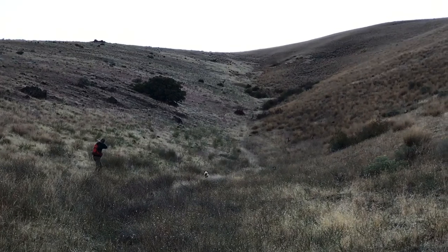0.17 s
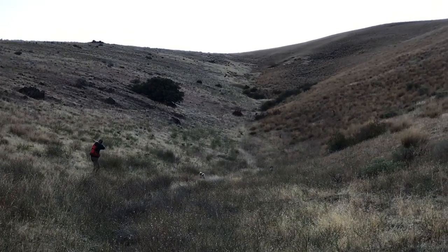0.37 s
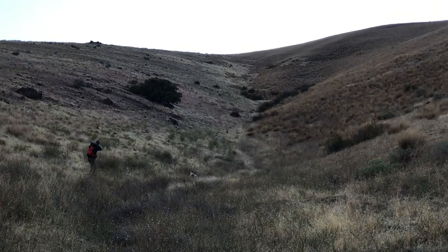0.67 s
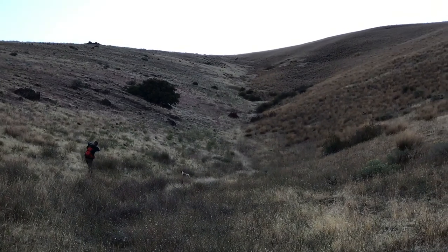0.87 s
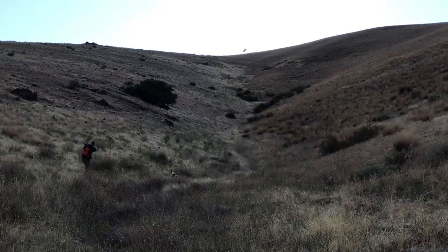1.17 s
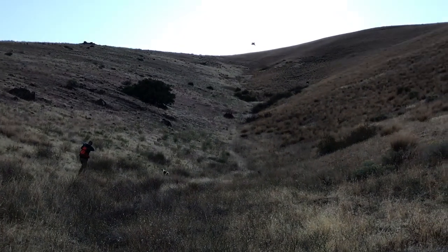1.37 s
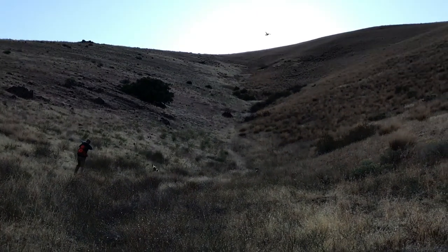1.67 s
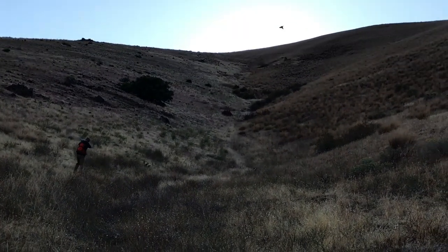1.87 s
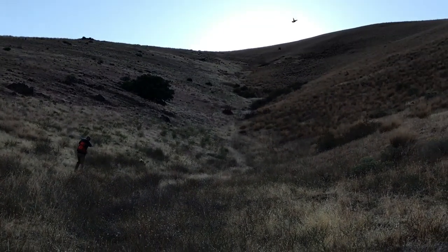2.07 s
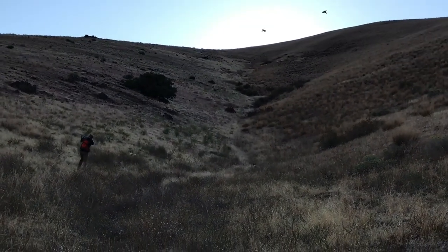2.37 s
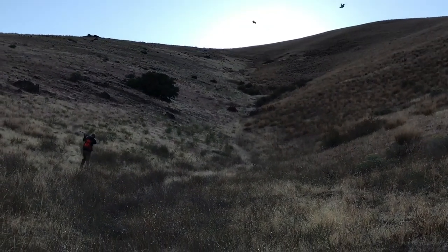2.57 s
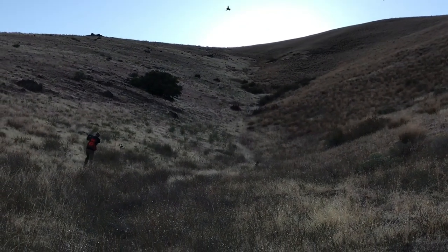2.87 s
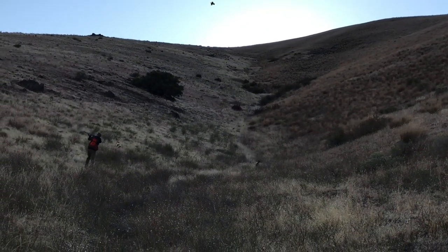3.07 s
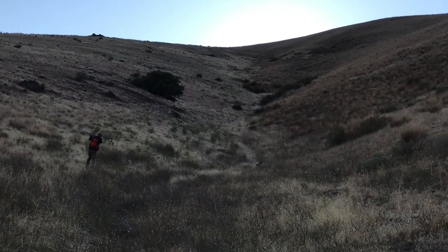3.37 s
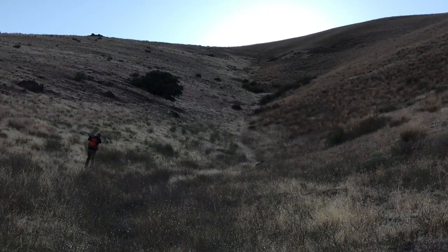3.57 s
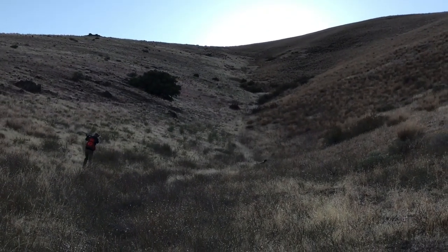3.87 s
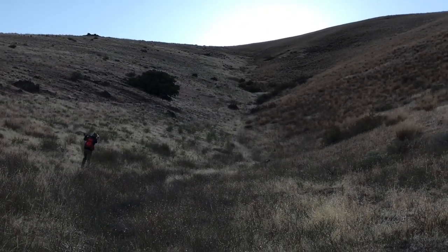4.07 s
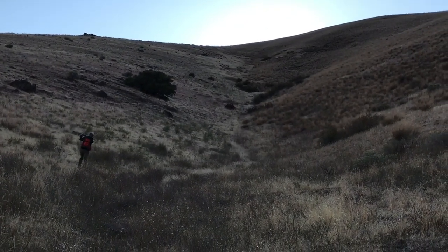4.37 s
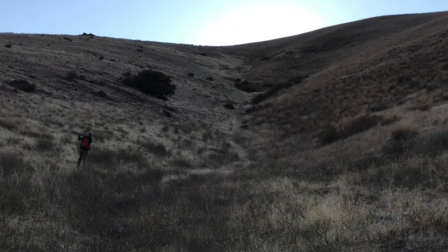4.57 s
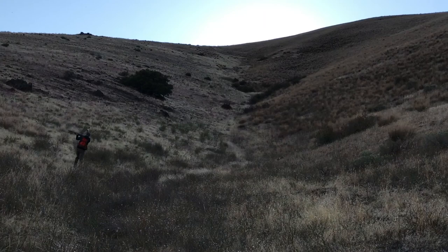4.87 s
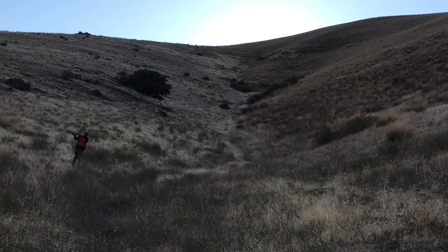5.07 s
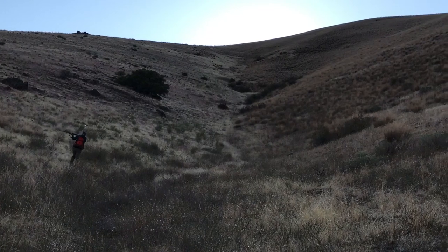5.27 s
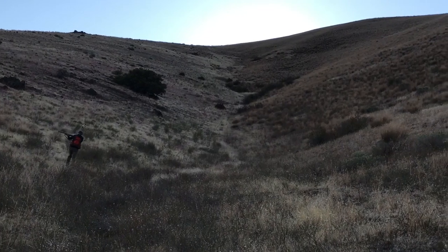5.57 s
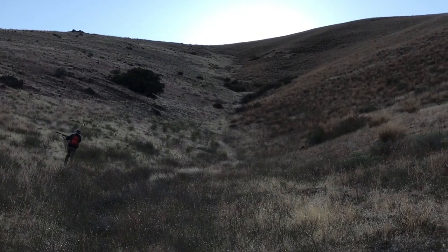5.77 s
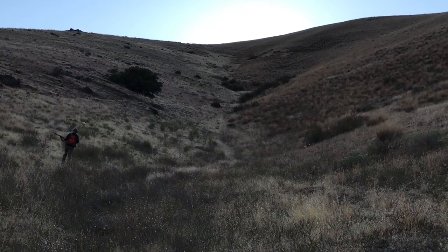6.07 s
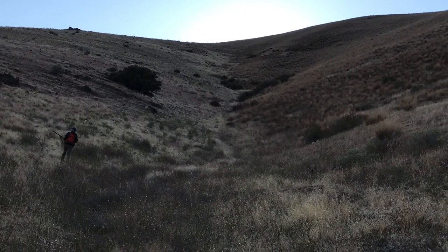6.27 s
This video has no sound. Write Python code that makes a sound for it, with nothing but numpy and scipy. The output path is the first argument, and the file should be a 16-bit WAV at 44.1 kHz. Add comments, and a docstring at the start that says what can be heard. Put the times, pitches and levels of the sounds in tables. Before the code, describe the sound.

In an open grassy gully, the tail of an earlier shot is dying as dry stalks snap and a bird gives one tiny chirp. Then three shotgun blasts come roughly two seconds apart, some way from the microphone: sharp crack, low thump, quick slaps off the ridges, and a wash that dulls as it fades. Soft wind rumbles on the microphone throughout.

```python
"""A grassy gully: three shotgun blasts some way off, with the tail of an earlier one still dying at the start.
Each blast is a filtered N-shaped crack with a ground bounce, and a low thump of decaying sines.
Slopes answer with noise bands: a wash that dulls with distance, and distinct slaps from ridges.
Band-passed noise makes the wind's rumble, moan, whooshes and hiss; dry grass snaps in short noise bursts,
and one bird chirps a gliding tone."""
import sys
import numpy as np
from scipy import signal
from scipy.io import wavfile

SR = 44100
rng = np.random.default_rng(int(sys.argv[2]) if len(sys.argv) > 2 else 0)


def bounce(signal):
    """Save signal as a 16-bit WAV file at the path given by the first command-line argument."""
    frames = np.transpose(np.atleast_2d(signal))
    limited = np.clip(frames, -1, 1)
    pcm = np.round(limited * 32767).astype(np.int16)
    wavfile.write(sys.argv[1], SR, pcm)


def gain_from_db(level_db):
    """Turn a decibel level (scalar or array-like) into a linear amplitude factor."""
    decades = np.asarray(level_db, float) / 20
    return 10 ** decades


N = 283122   # samples

# When the three blasts arrive. Each entry: time in seconds.
SHOT_TIMES = np.array([.8108, 2.6735, 4.7617])
# Fade of the far wash, the same hills for every shot. Each row: time after the shot in seconds, level in dB,
# lift of the low mids in dB.
WASH_FADE = [(.15, -46.5, -4.5), (.2, -46, -3.5), (.5, -45.5, -3), (.62, -49.5, 1), (.8, -56, 1),
             (1.05, -62, 0), (1.17, -64.5, 1), (1.24, -59.5, -5), (1.32, -63, -0.5), (1.8, -66.5, -1)]


def rms_one(x):
    """Scale to rms 1."""
    return x / np.sqrt(np.mean(x ** 2) + 1e-20)


def in_time(rows):
    """Turn table columns into curves over all samples; the first column is seconds."""
    s, *columns = np.transpose(rows)
    return [np.interp(np.arange(N) / SR, s, c) for c in columns]


def at_hz(points, hz):
    """Read a spectrum on a log frequency axis."""
    point_hz, value = np.transpose(points)
    return np.interp(np.log(hz), np.log(point_hz), value)


def band(x, low_hz, high_hz):
    """Band-pass."""
    sos = signal.butter(2, [low_hz, min(high_hz, .45 * SR)], "band", fs=SR, output="sos")
    return signal.sosfilt(sos, x)


def drift(rate_hz):
    """Slow random wander around zero with rms 1, computed at every 20th sample."""
    r = np.exp(-2 * np.pi * rate_hz * 20 / SR)
    white = rng.standard_normal(N // 20 + 2002)
    slow = signal.lfilter([1], [1, -2 * r, r * r], white)[2000:]   # skip the filter's start
    return np.interp(np.arange(N) / 20, np.arange(len(slow)), rms_one(slow))


def clicks(times, gains):
    """Single-sample impulses at the given seconds."""
    out = np.full(N, 1e-18)
    np.add.at(out, np.round(np.asarray(times) * SR).astype(int), gains)
    return out


def ring(x, hz, t60):
    """Two-pole resonator: a unit click starts a decaying sine of about height 1."""
    r, w = gain_from_db(-60 / (t60 * SR)), 2 * np.pi * hz / SR
    return signal.lfilter([0, np.sin(w)], [1, -2 * r * np.cos(w), r * r], x)


def resonate(x, hz, width_hz):
    """Band resonance with gain 1 at its peak."""
    r = np.exp(-np.pi * width_hz / SR)
    poles = [1, -2 * r * np.cos(2 * np.pi * hz / SR), r * r]
    return signal.lfilter([(1 - r * r) / 2, 0, (r * r - 1) / 2], poles, x)


def bands():
    """Third-octave noise bands of unit density, neighbours unrelated: (centre Hz, width Hz, noise)."""
    edges = 110 * 2 ** (np.arange(21) / 3)
    white = rng.standard_normal((2, N))
    out = []
    for k, (low, high) in enumerate(zip(edges, edges[1:])):
        width = high - low
        out.append((np.sqrt(low * high), width, np.sqrt(width) * rms_one(band(white[k % 2], low, high))))
    return out


def since_shot():
    """Index of the latest shot (0 is the earlier one) and seconds since it, at every sample."""
    t = np.arange(N) / SR
    fired = np.r_[-0.85, SHOT_TIMES]
    last = np.searchsorted(fired, t) - 1
    return last, t - fired[last]


def clumps():
    """Rocks and hollows: lone stronger returns swell the gain for milliseconds; mean power 1."""
    per_s, swell_s, mean_db = 110, .002, -4
    hits = (rng.random(N) < per_s / SR) * rng.exponential(1, N) * gain_from_db(mean_db) + 1e-18
    r = np.exp(-1 / (swell_s * SR))
    return rms_one(1 + np.e * (1 - r) * signal.lfilter([1], [1, -2 * r, r * r], hits))


def wash(noise):
    """Countless small reflections: near slopes die fast, far ones lose treble to the air as paths grow."""
    # Colour of the slopes. Each row: frequency in Hz, relative level per Hz in dB.
    wash_colour = [(88, -40), (150, -10), (331, -3), (598, -4), (716, -10.5), (827, -13.5), (1340, -13),
                   (2000, -13), (2220, -9.5), (3300, -19), (4170, -13), (6080, -21.5), (7280, -16),
                   (11000, -40.5), (14300, -64), (22000, -120)]
    # Far wash trim, the earlier shot and then the three. Each entry: offset in dB.
    far_trim = [-1.5, 1.5, -1.5, -9.5]
    # Close slopes, dense and bright, one entry per blast: level in dB.
    near_level = [-27.5, -23, -30]
    # Decay of the close slopes at pace 1. Each row: frequency in Hz, time to fall 60 dB in seconds.
    near_decay = [(150, 0.33), (600, 0.3), (1500, 0.3), (4000, 0.28), (10000, 0.25)]
    # By where the barrel points, one entry per blast: decay speed as a factor.
    near_pace = [0.71, 0.87, 0.93]
    # By where the barrel points, one entry per blast: offset below 600 Hz in dB.
    near_low = [-4, 0, -1.5]
    # Air loss at 5 kHz, its growth with pitch, and the path length where it stops growing.
    air_db_per_s, air_power, air_most_s = 18, 2.48, 0.97
    near_rise_s = .011

    last, since = since_shot()
    s, fade_db, lift_db = np.transpose(WASH_FADE)
    far_db = np.array(far_trim)[last] + np.interp(since, s, fade_db)
    lift_db = np.interp(since, s, lift_db)
    near_db = np.r_[-120, near_level][last]   # close slopes of the earlier shot are all but silent
    pace = np.r_[1, near_pace][last]
    low_db = np.r_[0, near_low][last]
    rocks = [clumps() ** np.exp(-since ** 2) for _ in range(5)]   # blurred on long paths
    near, far, middle_power = 0, 0, 0
    for k, (hz, width, x) in enumerate(noise):
        colour_db = at_hz(wash_colour, hz)
        x = x * gain_from_db(colour_db + 2.0 * drift(30))   # each band flickers on its own
        # the lift is full from 220 to 450 Hz and gone at 900 Hz
        lift = np.clip(np.log2(900 / hz), 0, 1) * (hz > 220) * lift_db
        air_loss = air_db_per_s * (hz / 5000) ** air_power * np.minimum(since, air_most_s)
        far = far + gain_from_db(lift - air_loss) * rocks[k // 4] * x   # four bands share one set of rocks
        near_fall = 60 * pace * since / at_hz(near_decay, hz)
        near = near + gain_from_db(near_db + low_db * (hz < 600) - near_fall) * x
        middle_power = middle_power + gain_from_db(colour_db) ** 2 * width * (500 < hz < 3000)
    near = near * (1 - np.exp(-since / near_rise_s)) * gain_from_db(drift(90))
    far = far * gain_from_db(far_db + 0.41 * drift(50))
    return (near + far) / np.sqrt(middle_power)


def roll():
    """The thump rolls on among the hills as lumpy low noise that fades like the wash."""
    # Low roll, the earlier shot and then the three. Each entry: level at its start in dB.
    roll_level = [-56, -46, -49, -53]
    last, since = since_shot()
    s, fade_db, _ = np.transpose(WASH_FADE)
    level_db = np.array(roll_level)[last] + np.interp(since, s, fade_db) - fade_db[0]
    return gain_from_db(level_db) * rms_one(band(rng.standard_normal(N), 22, 62) * gain_from_db(1.5 * drift(13)))


def wind(noise):
    """Wind as noise bands: lumpy microphone rumble, low moan, soft whooshes, grass hiss and still air."""
    # Strength of the wind. Each row: time in seconds, rumble level in dB.
    wind_level = [(0.0, -61), (0.5, -57), (2.2, -60), (3.9, -63.5), (4.7, -65), (6.0, -70.5), (6.42, -67)]
    # Gust knocks on the microphone. Each row: time in seconds, level in dB.
    knock_rows = [(6.108, -50), (6.329, -47.5)]
    # Whooshes near 900 Hz. Each row: peak time in seconds, half length in seconds, level in dB,
    # level of the low moan near 200 Hz in dB.
    whoosh_rows = [(2.57, 0.32, -56.5, -64), (3.85, 0.35, -60.5, -75), (6.42, 0.23, -67, -84.5)]
    # Colour of the quiet air. Each row: frequency in Hz, relative level per Hz in dB.
    still_colour = [(59, -37), (100, -17), (220, -10.5), (429, 5), (564, -5.5), (674, 3.5), (1800, -8),
                    (6220, -36), (9780, -23.5), (11000, -38.5), (14300, -78), (22000, -120)]
    hiss_db, moan_db, still_db = -77.5, -78, -69.5   # hiss and moan at mean wind

    rumble_db, = in_time(wind_level)
    gust_db = 0.85 * (rumble_db - rumble_db.mean())   # share of the rumble's swing
    t = np.arange(N) / SR
    whoosh_gain, moan_gain = 0, gain_from_db(moan_db + gust_db)
    for peak_s, half_s, whoosh_db, whoosh_moan_db in whoosh_rows:
        swell = np.exp(-((t - peak_s) / half_s) ** 2)
        whoosh_gain = whoosh_gain + gain_from_db(whoosh_db) * swell
        moan_gain = moan_gain + gain_from_db(whoosh_moan_db) * swell ** 2
    white = rng.standard_normal((4, N))
    rumble = rms_one(band(white[0], 22, 56) * gain_from_db(drift(10)))
    moan = rms_one(band(white[1], 150, 230))
    whoosh = rms_one(band(white[2], 760, 1030))
    hiss = rms_one(band(white[3], 2300, 7440) * gain_from_db(2.0 * drift(30.44) + 1.4 * drift(3)))
    # the noise runs backwards here, so that it does not match the wash
    still = rms_one(sum(gain_from_db(at_hz(still_colour, hz)) * x[::-1] for hz, _, x in noise))
    knock_s, knock_db = np.transpose(knock_rows)
    knocks = ring(clicks(knock_s, gain_from_db(knock_db)), 41.5, 0.21)
    return (gain_from_db(rumble_db) * rumble + moan_gain * moan + whoosh_gain * whoosh
            + gain_from_db(hiss_db + gust_db) * hiss + gain_from_db(still_db) * still + knocks)


def grass():
    """Each snapped stalk is a few milliseconds of bright noise; one brush packs many snaps together."""
    # The clearest snaps. Each row: time in seconds, level in dB, pitch that places the noise band in Hz.
    tick_rows = [(0.087, -59, 7000), (0.255, -54.5, 6500), (0.2707, -54, 4800), (0.314, -57, 5170),
                 (0.326, -49.5, 4200), (0.403, -53.5, 5000), (0.549, -55, 5470), (0.596, -54, 5970),
                 (1.8206, -48.5, 2770), (2.1838, -50, 2450), (2.5562, -50, 3980), (3.4634, -48, 2940),
                 (4.4552, -53, 2560), (6.292, -48.5, 2840), (6.314, -59, 4000)]
    faint_per_s, faint_db = 5.0, -68   # fainter snaps come at random
    brush_s, brush_length_s, brush_per_s, brush_db = .315, .035, 600, -63.5   # one brush through the stalks

    out, t = np.zeros(N), np.arange(400) / SR
    for s, level_db, hz in tick_rows:
        snap = rms_one(band(rng.standard_normal(400), hz / 4.4, hz * 1.32))
        i = round(s * SR)
        out[i:i + 400] += gain_from_db(level_db) * snap * np.exp(-t / 0.0022)
    draw = rng.random(N) * SR   # falls below a rate per second that often
    sizes = gain_from_db(1.9 * np.minimum(rng.exponential(1, N), 3))
    brush_rate = brush_per_s * np.exp(-((np.arange(N) / SR - brush_s) / brush_length_s) ** 2)
    snaps = sizes * (gain_from_db(faint_db) * (draw < faint_per_s) + gain_from_db(brush_db) * (draw > SR - brush_rate))
    envelope = signal.fftconvolve(snaps, np.exp(-t / 0.0011))[:N]
    return out + envelope * rms_one(band(rng.standard_normal(N), 2300, 8000))


def bird():
    """One short gliding sine with its octave, made hoarse by fast wander in pitch and level."""
    # The glide. Each row: time in seconds, mean pitch in Hz, mean level in dB.
    chirp_rows = [(.425, 1750, -74), (.44, 2050, -62), (.456, 1720, -57), (.464, 1900, -54),
                  (.475, 2100, -63), (.5, 1900, -68), (.56, 1850, -72)]
    hz, level_db = in_time(chirp_rows)
    t = np.arange(N) / SR
    phase = 2 * np.pi * np.cumsum(hz * (1 + .03 * drift(150))) / SR
    note = np.sin(phase) + gain_from_db(-15) * np.sin(2 * phase)
    sounding = (t > chirp_rows[0][0]) * (t < chirp_rows[-1][0])
    return sounding * gain_from_db(level_db + 7.2 * drift(140)) * note


def slaps(noise):
    """Smeared noise bursts: ticks ahead of each blast, slaps and swells from slopes and ridges around it."""
    # Ticks ahead of every blast. Each row: lead in seconds, rise time in seconds.
    ahead_times = [(.0385, .0011), (.036, .009), (.0325, .0007), (.0195, .0018), (.0055, .002)]
    # The same ticks. Each row: level in dB before the trim per blast, then the tone at 500 Hz
    # and at 5 kHz in dB against 1.7 kHz.
    ahead_tone = [(-41.5, 2.5, -3), (-59.5, 3, 0.5), (-63.5, -6.5, 5.5), (-45, 5, -2.5), (-33.5, -9, -2)]
    # Trim of the ticks, one entry per blast: offset in dB.
    ahead_trim = [5.5, 4.5, 6.5]
    # Slopes and ridges. Each row: lag in seconds before stretching, rise time in seconds,
    # tone at 500 Hz in dB against 1.7 kHz, then the level in dB for each of the three blasts.
    echo_rows = [(-.0006, 0.0048, -23.5, -15.5, -19.5, -21.5), (.0055, 0.0016, 13, -39.5, -26, -36.5),
                 (0.018, 0.0016, -14.5, -22, -21.5, -28), (0.121, 0.0031, -19, -29, -48, -49),
                 (0.172, 0.0026, -15, -55, -32, -45), (0.28, 0.006, -1, -45, -33.5, -42),
                 (.311, 0.0071, 7, -50, -40, -43), (0.34, 0.0027, 5, -40, -50, -43.5),
                 (.353, 0.0087, 5, -37, -29, -44.5), (0.356, 0.0022, -7.5, -24, -25.5, -37.5),
                 (.444, 0.0014, -15, -54, -47, -59), (0.4663, 0.0017, -35, -32.5, -28.5, -50),
                 (.494, .0033, -30, -28.5, -44, -54), (.52, 0.0033, 1, -34, -35.5, -49),
                 (.59, 0.003, -11, -31, -47, -45), (0.662, 0.019, -8, -34.5, -38.5, -44),
                 (0.689, 0.0033, 18.5, -47, -50.5, -61), (0.845, 0.004, -9, -46.5, -47.5, -46.5)]
    # The shooter shifts a little, so the paths do too. One entry per blast: lag factor.
    path_stretch = [.991, 1.0, 1.007]
    # Treble at 5 kHz against 1.7 kHz: at no lag, loss with lag, gain per dB of missing bass (small faces).
    treble_db, dulls_db_per_s, small_is_bright = -7, 17, 0.25
    band_share_db = -11.5   # one noise band against the peak of the whole burst

    bursts = []
    for shot, trim_db in zip(SHOT_TIMES, ahead_trim):
        for (lead, rise_s), (level_db, low_db, high_db) in zip(ahead_times, ahead_tone):
            bursts.append((shot - lead, level_db + trim_db, low_db, high_db, rise_s))
    for k, (shot, stretch) in enumerate(zip(SHOT_TIMES, path_stretch)):
        for lag, rise_s, low_db, *levels in echo_rows:
            high_db = treble_db - dulls_db_per_s * lag - small_is_bright * low_db
            bursts.append((shot + stretch * lag, levels[k], low_db, high_db, rise_s))
    out = np.zeros(N)
    for s, level_db, low_db, high_db, rise_s in bursts:
        u = np.arange(int(8 * rise_s * SR)) / (rise_s * SR)
        colour = [(220, low_db - 14.0), (520, low_db), (1700, 0.0065), (5000, high_db),
                  (8500, 3.8 * high_db - 5.0), (11000, 2.2 * high_db - 31)]   # (Hz, dB)
        i = round(s * SR)
        early = slice(i - 999, i - 999 + len(u))   # not the stretch of noise the wash uses here
        burst = sum(gain_from_db(at_hz(colour, hz)) / np.sqrt(width) * x[early] for hz, width, x in noise)
        out[i:i + len(u)] += gain_from_db(level_db + band_share_db) * u * np.exp(1 - u) * burst
    return out


def blasts():
    """N-shaped pressure cracks along four paths, then the low ringing thump and its return from the ridge."""
    # The three blasts. Each row: crack level, ground bounce, near slope and thump, all in dB.
    shot_levels = [(-1.5, -20.5, -6, -15.5), (-12, 2.5, -31, -15), (1, -9.5, -11.5, -17.5)]
    # Lag of the ground bounce, one entry per blast: seconds.
    bounce_lag = np.array([.0008, .001, .0015])
    # Thump partials. Each row: frequency in Hz, level in dB, time to fall 60 dB in seconds.
    thump_partials = [(62, 3.5, 0.079), (46.1, -10.5, .2), (93, -7, 0.087)]
    # The big ridge returns the thump too, one entry per blast: level in dB against the thump.
    ridge_level = [-13.5, -15.5, -19.5]
    shock_s, suction_s = .00009, 0.00039   # push and pull of the N-shaped wave
    lead_s, lead_db, slope_s = .0009, -14, .0075   # small spike ahead, near slope behind
    thump_lag_s, ridge_s = 0.0047, .358

    crack_db, bounce_db, slope_db, thump_db = np.transpose(shot_levels)
    s, t = SHOT_TIMES, np.arange(200) / SR
    push = 1.13 * np.exp(-t / shock_s)
    pull = 0.51 * (t / suction_s) * np.exp(1 - t / suction_s)
    path_s = np.r_[s - lead_s, s, s + bounce_lag, s + slope_s]
    path_db = np.r_[crack_db + lead_db, crack_db, bounce_db, slope_db]
    crack = band(signal.fftconvolve(clicks(path_s, gain_from_db(path_db)), push - pull)[:N], 350, 11000)
    strikes = clicks(np.r_[s, s + ridge_s] + thump_lag_s, gain_from_db(np.r_[thump_db, thump_db + ridge_level]))
    thump = sum(gain_from_db(level_db) * ring(strikes, hz, t60) for hz, level_db, t60 in thump_partials)
    return crack + band(thump, 37, 380)


def boom():
    """The gully floor booms a little later: narrow low-mid noise swells and fades after each blast."""
    # Boom, one entry per blast: mean level at the top of the swell in dB.
    boom_level = [-32, -30, -36.5]
    low_hz, high_hz, rise_s = 530, 965, 0.031
    r = np.exp(-1 / (rise_s * SR))
    hits = clicks(SHOT_TIMES, gain_from_db(boom_level))
    swell = np.e * (1 - r) * signal.lfilter([1], [1, -2 * r, r * r], hits)
    narrow = band(band(rng.standard_normal(N), low_hz, high_hz), low_hz, high_hz)
    return swell * gain_from_db(2.0 * drift(40)) * rms_one(narrow)


def hills(noise):
    """Gully resonances colour the wash and slaps; boom and roll join them."""
    # Gully resonances. Each row: frequency in Hz, width in Hz, level in dB.
    gully_rows = [(425.6, 110, -6.5), (568, 90, -9.5), (842, 13, -8.5), (1900, 400, -12.5)]
    back = wash(noise) + slaps(noise)
    coloured = sum(gain_from_db(level_db) * resonate(back, hz, width_hz) for hz, width_hz, level_db in gully_rows)
    return 1.021 * back + coloured + boom() + roll()


def soft_ground(x):
    """Soft ground cancels most of a low band."""
    dip_hz, dip_width_hz, share = 150.4, 44, 0.81
    return x - share * resonate(x, dip_hz, dip_width_hz)


def scene():
    """All sources, mono."""
    noise = bands()
    shots = soft_ground(blasts() + hills(noise))
    return (shots + wind(noise) + grass() + bird())[None]


def top_cut(x):
    """Nothing passes above the cut-off."""
    return signal.sosfilt(signal.butter(12, 11280, fs=SR, output="sos"), x)


def record(dry):
    """Peaks are rounded towards a ceiling, then a steep low-pass ends the treble."""
    ceiling, cutoff_hz = .62, 11050
    rounded = ceiling * np.tanh(dry / ceiling)
    low_pass = signal.ellip(12, .5, 58, cutoff_hz, fs=SR, output="sos")
    mix = signal.sosfilt(low_pass, rounded)
    return top_cut(mix)


dry = scene()
out = record(dry)
bounce(out)
```